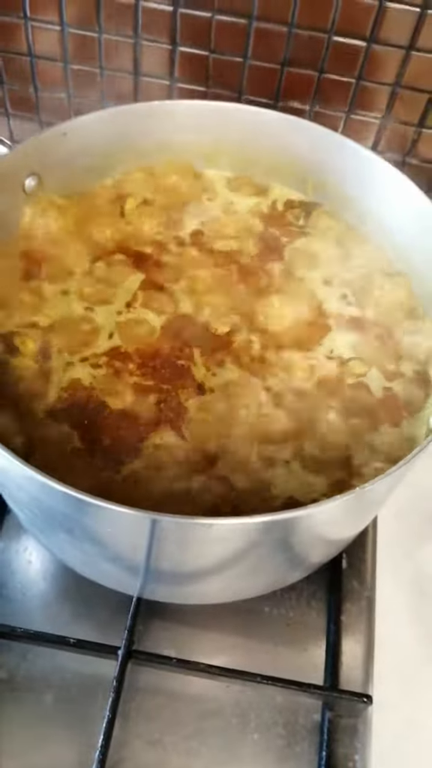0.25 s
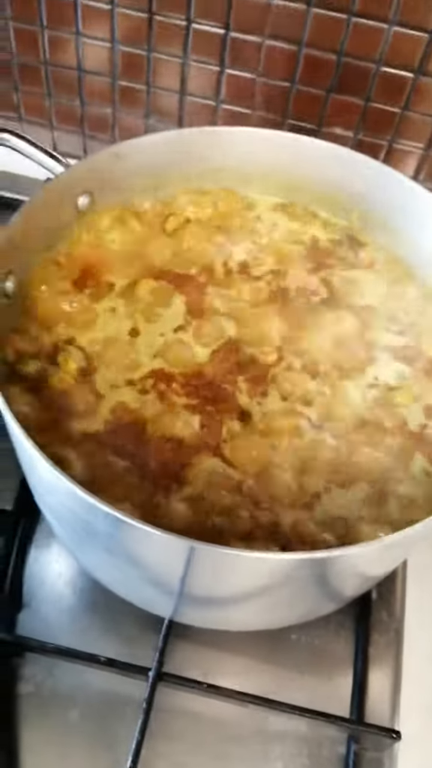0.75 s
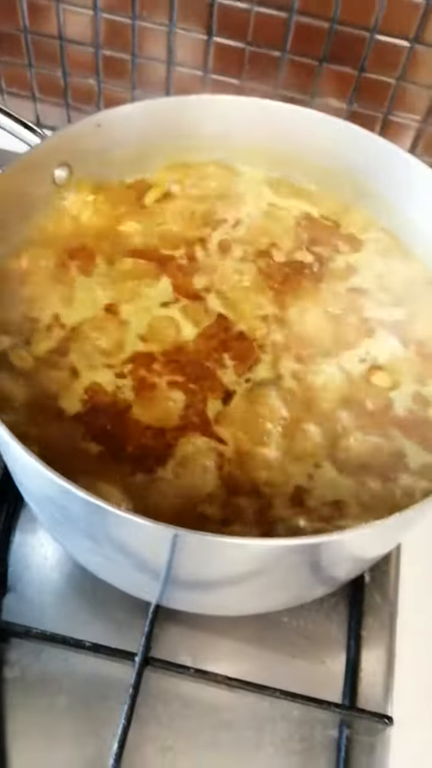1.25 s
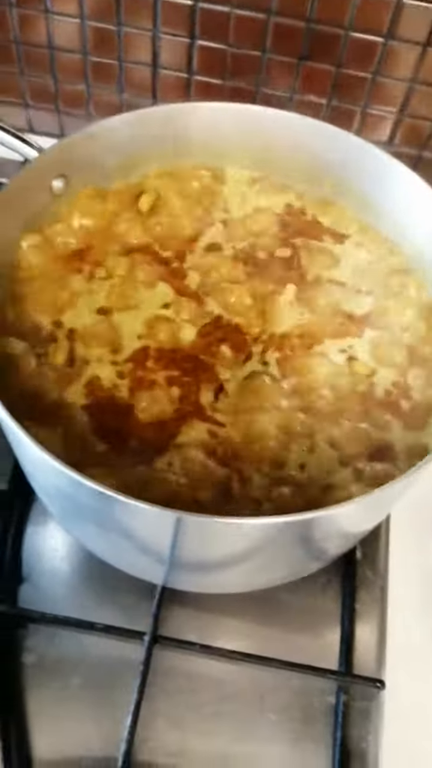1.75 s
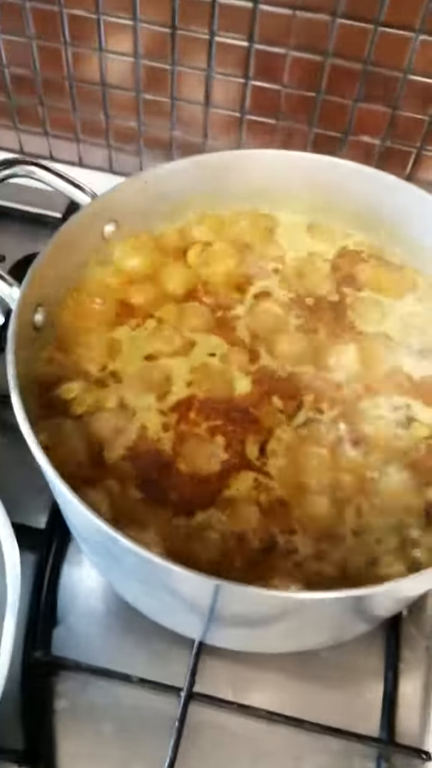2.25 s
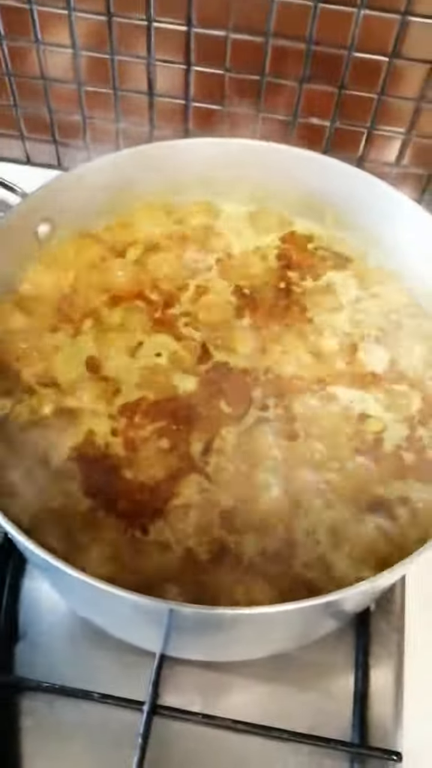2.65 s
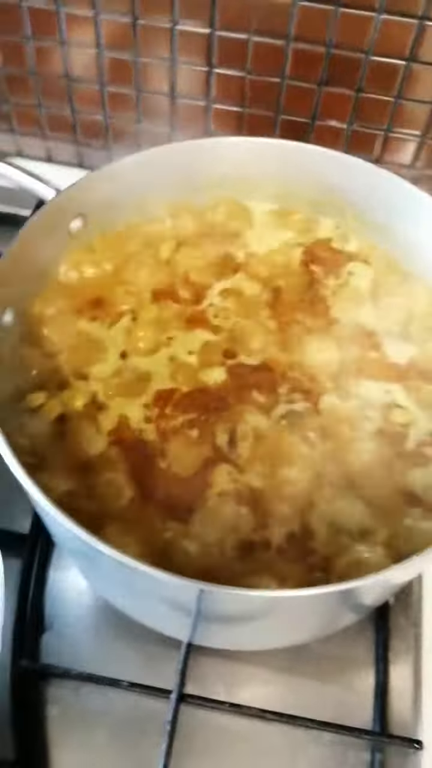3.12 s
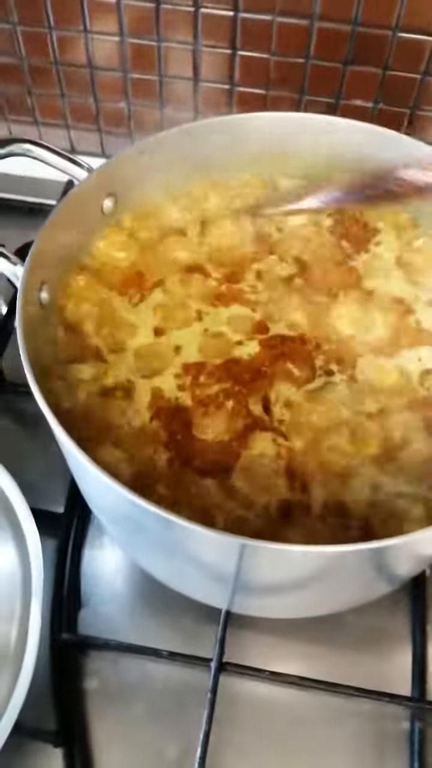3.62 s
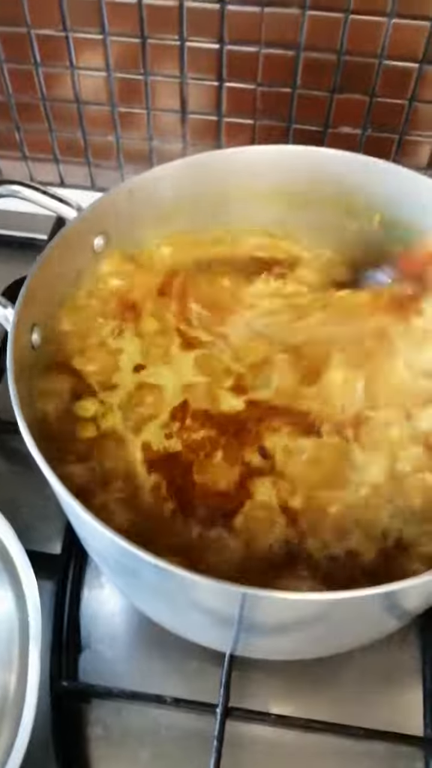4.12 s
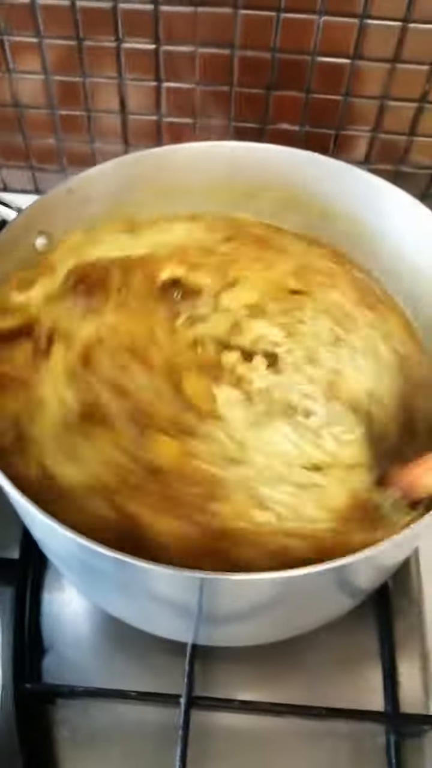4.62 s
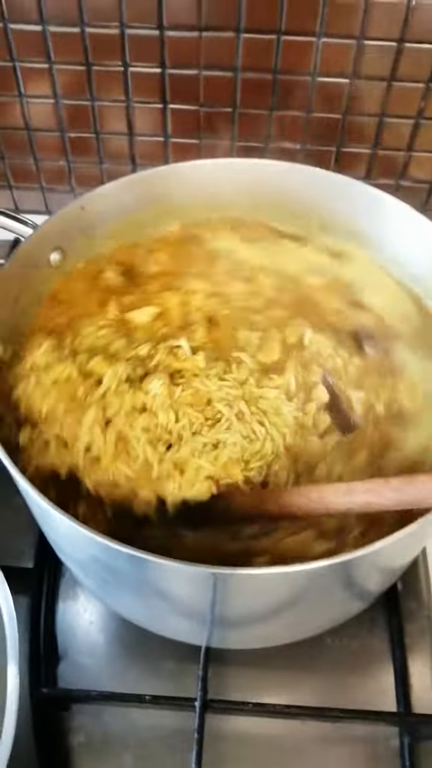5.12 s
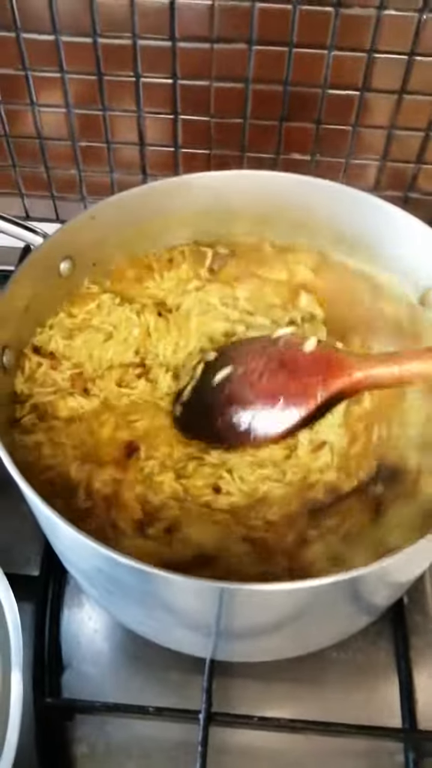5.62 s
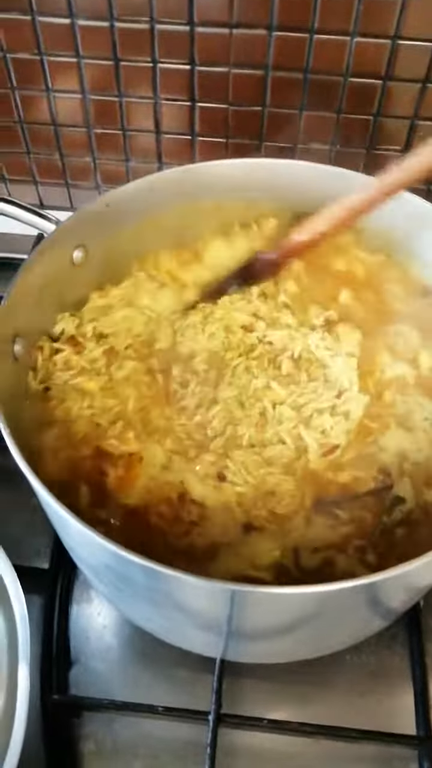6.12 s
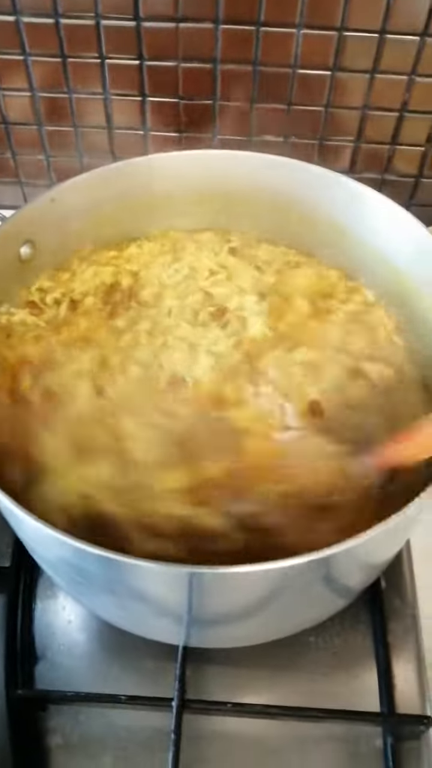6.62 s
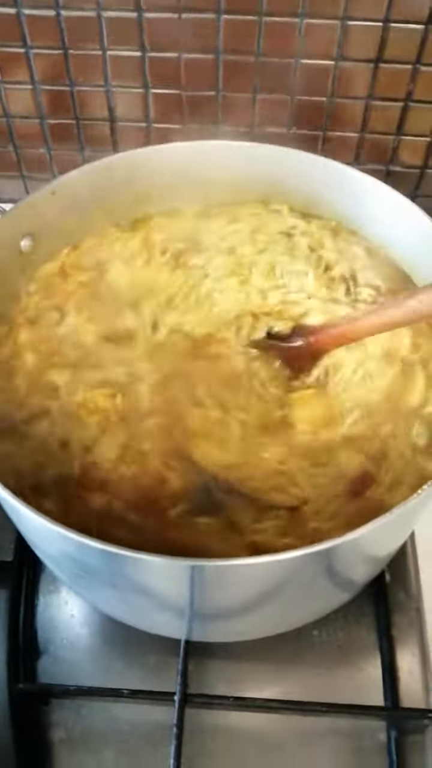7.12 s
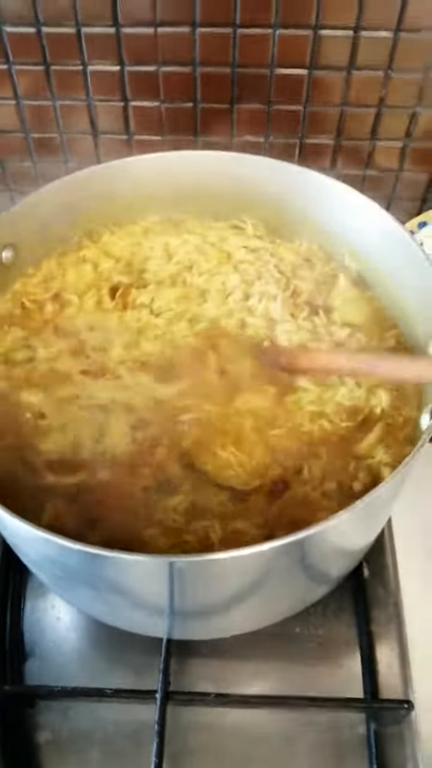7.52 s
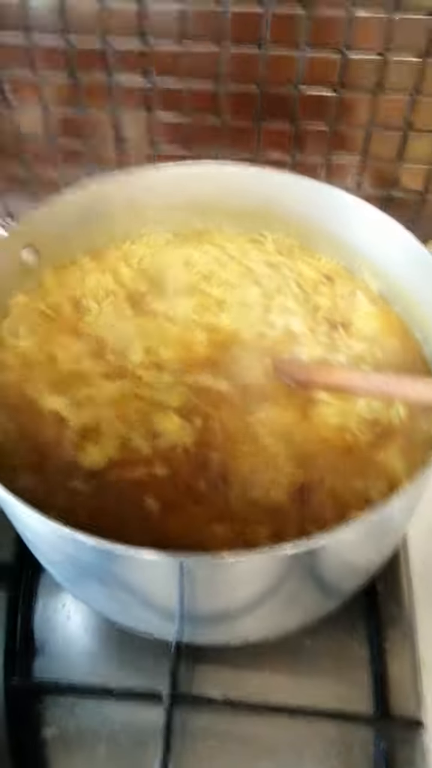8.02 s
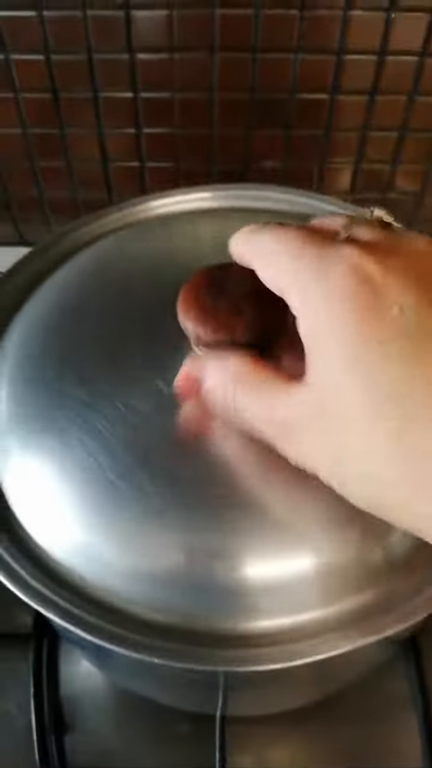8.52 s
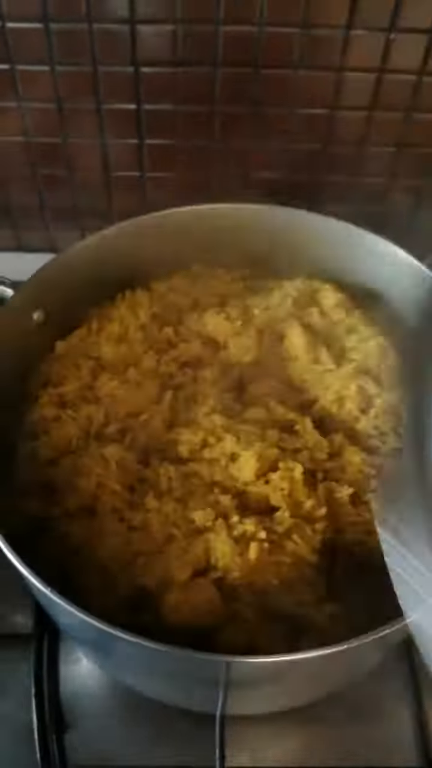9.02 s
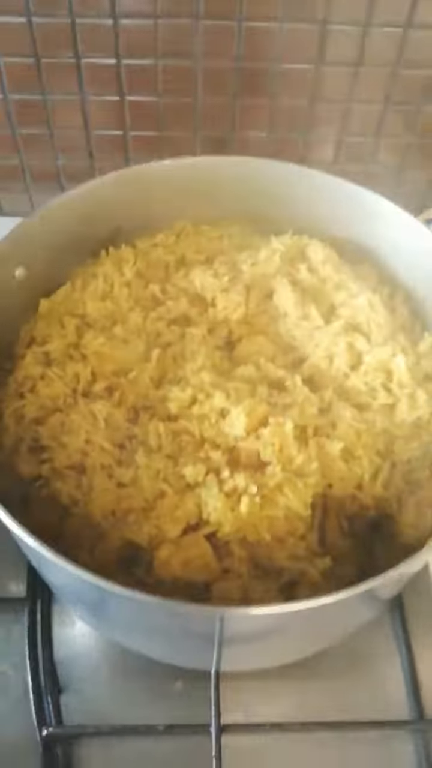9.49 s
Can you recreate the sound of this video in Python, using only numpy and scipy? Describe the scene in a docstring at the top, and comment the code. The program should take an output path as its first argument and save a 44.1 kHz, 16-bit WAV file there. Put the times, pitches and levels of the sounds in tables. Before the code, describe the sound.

A simmering metal pot hisses and spatters, wooden spoon tapping and stirring, before the hiss cuts off and a lid lifts with soft steam.

```python
"""Rice simmering on a gas ring

Rice simmers in broth in an open metal pot in a tiled kitchen: banded noise for roar, broth and hissing
jets, ringing grains for bubbles and droplets, short rising tones. A steel spoon clinks in decaying modes;
a wooden spoon knocks and stirs through pot resonances. Hiss, spatter and small bubbles end at once; a
quieter passage follows, in which a lid is lifted off, ringing, and noise bands of steam escape.
Two ports hear it, left one first.
"""
import sys
import numpy as np
from scipy import signal
from scipy.fft import rfft, irfft, next_fast_len
from scipy.io import wavfile

SR = 44100
rng = np.random.default_rng(int(sys.argv[2]) if len(sys.argv) > 2 else 0)


def persist_wave(psi):
    """Save psi, clipped to +-1, as 16-bit WAV."""
    counts = np.round(np.clip(psi, -1, 1) * 32767).astype(np.int16)
    wavfile.write(sys.argv[1], SR, np.atleast_2d(counts).T)


N = 429975

# Noise spectra, relative density: f/Hz, level/dB
# low roar under the simmer
ROAR_SPECTRUM = [(15, -46), (25, -17), (60, 1.5), (102, -5), (141, 4), (237, -13), (289, -2.5), (367, -3),
                 (436, -31), (600, -1), (780, -51), (1320, -120)]
# broth
BROTH_SPECTRUM = [(240, -22), (400, -36), (436, -9), (609, -8.5), (744, -6.5), (1050, 4.5), (1220, -35),
                  (1350, -16.5), (1450, -22), (1760, -10.5), (1950, -25), (2200, -32), (2860, -53),
                  (4840, -120)]
# gas jets
HISS_SPECTRUM = [(760, -22), (1300, -16), (1760, -26), (3140, -5), (3760, -19), (5720, -3), (6480, -2.5),
                 (7830, -21), (8700, -12.5), (9070, -23), (13000, -9), (14900, -13), (15500, -20),
                 (16000, -48)]
# steam
STEAM_SPECTRUM = [(880, -20), (1500, -6), (2410, -13.5), (3000, -14.5), (5770, -17.5), (6310, 38),
                  (7390, -3.5), (10800, -9.5), (14800, -6), (16000, -13)]
# quiet kitchen air
AIR_SPECTRUM = [(410, -15), (700, 1), (1870, -11), (2330, -3.5), (3370, 7), (3640, -31), (4730, 6.5),
                (16000, -19.5)]
# Small bubbles, grain pitches: f/Hz, level/dB
BUBBLE_SPECTRUM = [(450, -10.5), (800, 2.5), (1050, 3.5), (1400, -9), (2800, 0)]
# Droplets on hot metal, grain pitches: f/Hz, level/dB
SNAP_SPECTRUM = [(2300, 0), (3800, -10), (6500, 9), (9500, 0)]
# Left-right likeness of the noise: f/Hz, likeness/0-1
LIKENESS = [(60, .92), (170, .93), (340, .8), (520, .15), (1030, .45), (1600, .2), (5500, .2), (6500, .5),
            (7600, .1), (15000, .15)]
# Port colour: f/Hz, left over right/dB
PORT_TILT = [(60, -3), (92, -2.5), (140, -1), (210, -3.5), (330, -2), (500, -4), (770, 3.5), (1170, 0),
             (1790, -1.5), (2740, -6.5), (4190, -2), (6410, -3), (9810, 7.5), (15000, -2)]

# Vigour of the simmer, as its low roar: t/s, level/dB
HEAT_CURVE = [(0, -59.5), (1.6, -57.5), (2.05, -54), (2.95, -53.5), (3.4, -54.5), (5.0, -56.5),
              (7.4, -57.5), (8.05, -57), (8.75, -53.5), (9.0, -55.5), (9.75, -59.5)]
# Jets of the open flame: t/s, level/dB
JET_CURVE = [(0, -58), (1.6, -59.5), (1.74, -53.5), (3.0, -53), (7.3, -53.5), (8.06, -52)]

# Burner resonances: f/Hz, width/Hz, level/dB
WHISTLES = [(1990, 61, 8.5), (2486, 184, 7), (3214, 85, 5.5), (5590, 370, 0.5), (5890, 20, 7.5),
            (6444, 217, 14), (7085, 136, 5), (8475, 51, 16), (11400, 94, -27), (14750, 720, 5)]
# Full pot: f/Hz, width/Hz, level/dB
THUD_MODES = [(150, 60, -2), (300, 80, 0), (400, 90, -3), (560, 120, 2), (650, 120, 0), (870, 160, -2)]
# Wood and wall: f/Hz, width/Hz, level/dB
KNOCK_MODES = [(1100, 320, -28), (1590, 860, 9), (2040, 500, 16.5), (2575, 530, 12.5), (3740, 1000, 13.5)]
# Rim: f/Hz, width/Hz, level/dB
TICK_MODES = [(5400, 1740, 11), (5460, 340, -1), (7010, 240, 10.5), (7320, 850, 13.5), (8450, 600, 2.5),
              (11240, 1400, -6), (14100, 3300, -8.5)]
# Steel spoon modes: f/Hz, level/dB, t60/s, pan/dB
SPOON_MODES = [(2564, -1, .36, -2), (2585, -3, .03, -3), (2603, -3, .33, -5), (2655, -12, .05, -2),
               (2950, -16, .05, -2), (3400, -17, .05, 0), (3750, -16, .05, 0), (5071, -21, .07, 0),
               (6072, -19, .2, -3), (6557, -13, .18, -5), (6590, -9, .22, 0), (6625, -13, .18, -3),
               (7354, -21, .1, -4), (7897, -24, .1, -4), (8990, -17, .12, 2), (9130, -21, .12, 0),
               (10770, -17, .1, -2), (13145, -22, .07, -2), (14222, -16, .06, -6)]
# Lid modes: f/Hz, level on rim/dB, level free/dB, t60 free/s
LID_MODES = [(950, 2, -20, .1), (1357, -16, 0, 1.5), (1433, -16, 1.5, 1.3), (1660, 1, -20, .1),
             (1850, 2, -20, .1), (2166, 2, -18, .12), (2404, 0, -4, .95), (2568, -12, -7, .5),
             (3160, -12, -10, .3), (3268, 2, 1, .3), (3332, -3, 5, .27), (3650, -14, -12, .3),
             (4097, -14, -16, .25), (4613, -8, -8, .15), (5421, -6, -8, .13), (5885, 0, -9, .12),
             (6638, -2, -12, .15), (6724, -10, -11, .15), (6955, -4, -14, .15), (7111, -12, -9, .12),
             (7311, 4, -4, .1), (7558, -12, -5, .12)]

# Steel spoon touches: t/s, level/dB, upper modes/dB, top modes/dB
CLINKS = [(0.0, -47, -10, -10), (1.543, -21, -4.5, -2), (1.6208, -39, 10, -18), (1.632, -40.5, 11, -16),
          (1.698, -26.5, 10, 5.5)]
# Blows on the pot: t/s, thud/dB, knock/dB, tick/dB, thud centre f/Hz, knock centre f/Hz, t60/s, pan/dB
BLOWS = [(0.07, -58, -46, -51, 571, 1900, 0.017, 8), (0.071, -61, -40.5, -55, 571, 3000, 0.014, 11),
         (0.083, -49, -46, -60, 800, 1480, 0.03, 11), (0.353, -65, -48, -52, 600, 2400, .015, 7),
         (0.538, -65, -50, -58, 600, 1900, 0.018, 8), (0.897, -36.5, -34.5, -13.5, 312, 1650, 0.026, 2),
         (0.898, -58, -34, -38, 500, 2570, .03, 5), (2.014, -52, -53, -33.5, 568, 1120, .035, -3),
         (2.242, -63, -34, -46, 606, 1820, 0.07, 3), (2.246, -70, -36.5, -60, 606, 3300, 0.056, -3),
         (2.413, -33, -29, -25.5, 357, 1900, 0.066, -0.5), (2.417, -44, -35, -52, 800, 1230, 0.083, -2),
         (2.556, -58, -27, -35.5, 353, 2070, 0.034, 2), (2.558, -60, -28.5, -56, 353, 3170, 0.027, -1),
         (2.563, -47, -32, -55, 800, 1520, 0.033, 0), (2.691, -43, -40, -55, 700, 1970, 0.03, 2),
         (2.897, -43, -37.5, -56, 563, 1430, 0.03, 5), (2.956, -57, -43, -58, 361, 2420, 0.019, -4),
         (3.236, -65, -44, -44, 600, 2450, 0.033, 0), (3.466, -65, -43, -55, 600, 2550, 0.03, -4),
         (3.752, -33, -41, -55, 606, 1100, 0.026, -5), (4.903, -65, -41, -50, 700, 2700, 0.014, 2),
         (4.94, -65, -41, -41, 700, 2720, 0.023, 1), (4.945, -60, -38.5, -41, 850, 934, 0.04, 4),
         (5.066, -65, -46, -60, 400, 2600, 0.011, -2), (5.168, -63, -40, -55, 400, 2300, .012, 3),
         (5.181, -66, -39, -40, 363, 1690, 0.024, -4), (5.182, -63, -39.5, -55, 400, 2480, .015, -3),
         (5.773, -65, -38, -60, 299, 2940, 0.037, 2), (5.803, -68, -44, -51, 299, 2830, 0.033, 7),
         (5.84, -68, -43, -58, 299, 3100, 0.03, -2), (6.378, -44.5, -40, -41, 312, 1990, 0.03, 5),
         (6.42, -58, -39, -50, 400, 3100, .015, 3), (6.496, -62, -39, -55, 304, 2720, 0.027, 1),
         (6.5, -62, -40, -55, 304, 1250, 0.061, 8), (6.509, -67, -34, -55, 304, 3100, 0.01, 1),
         (6.519, -65, -35, -50, 304, 2730, 0.017, -3), (6.518, -63, -40, -33.5, 361, 1100, 0.02, 0),
         (6.628, -57, -40.5, -45, 619, 2100, 0.054, 6), (6.676, -65, -35, -49, 400, 3000, 0.018, 4),
         (6.696, -69, -40, -34.5, 221, 2880, 0.026, 7), (6.808, -65, -39.5, -57, 334, 2610, 0.028, 0),
         (6.946, -54, -39, -44, 350, 2740, 0.023, -5), (7.483, -24, -31.5, -44, 307, 1090, 0.039, -0.5),
         (7.485, -52, -32.5, -55, 306, 2330, 0.02, 8), (7.535, -29.5, -34, -53, 350, 1010, 0.037, 2),
         (7.75, -52, -23.5, -53, 560, 2470, 0.013, -2), (7.835, -67, -38, -60, 560, 2120, 0.016, 6),
         (7.974, -70, -45, -55, 560, 3570, 0.017, 4), (7.986, -69, -48, -33.5, 304, 1140, 0.025, 13),
         (8.186, -69, -42.5, -75, 530, 1610, 0.0089, -10), (8.31, -72, -51, -50, 288, 2200, 0.088, -7),
         (8.394, -24, -27.5, -19.5, 310, 942, 0.016, -2.5),
         (8.402, -31.5, -23.5, -18.5, 800, 1850, 0.071, -4),
         (8.419, -34, -30.5, -25, 280, 2190, 0.042, -8.5), (8.596, -40, -46, -48, 224, 1065, 0.1, -1),
         (8.613, -33.5, -34, -35, 314, 955, 0.065, -1), (8.614, -60, -38, -45, 314, 1910, 0.036, -1),
         (8.641, -37, -37, -33, 299, 3370, 0.031, 2), (9.697, -56, -46.5, -44, 549, 1200, 0.02, -2)]
# Short rising tones, from bubbles or small knocks: t/s, level/dB, starting f/Hz
POPS = [(0.09, -41, 900), (0.241, -37, 800), (0.309, -45, 754), (0.591, -39.5, 790), (0.613, -41, 750),
        (1.483, -43, 890), (1.513, -39, 845), (1.945, -41, 612), (2.036, -38, 880), (2.99, -40, 622),
        (3.377, -42, 842), (4.774, -44, 1000), (6.397, -36, 1100), (7.075, -38, 888), (0.166, -36, 850),
        (0.216, -31.5, 1100), (0.272, -36, 1500), (0.327, -34, 784), (0.54, -38, 790), (0.671, -36.5, 775),
        (1.38, -36, 890), (1.982, -32, 820), (2.323, -33.5, 686), (2.382, -32, 950), (2.715, -33.5, 930),
        (2.865, -36.5, 675), (2.927, -41, 705), (3.115, -35, 1590), (3.201, -35.5, 750),
        (3.567, -35.5, 1100), (3.93, -33, 1360), (4.239, -30, 1390), (4.268, -34, 1350), (4.966, -36, 930),
        (2.329, -32, 1500), (2.367, -33, 1900), (2.403, -29, 810), (2.468, -35, 900), (2.755, -37, 1150),
        (5.706, -33, 1030), (5.781, -40, 1040), (5.83, -39, 1080), (5.976, -34, 1340), (8.187, -34, 900)]
# Spoon strokes on the wall: t/s, length/s, grit/dB, squeak/dB, first f/Hz, last f/Hz
STROKES = [(1.614, .04, -53, -70, 3500, 3500), (2.407, 0.067, -53.5, -44.5, 2350, 2240),
           (2.555, 0.12, -58.5, -45.5, 2535, 2014), (4.866, 0.089, -60.5, -58, 1900, 1940),
           (5.747, 0.069, -71, -64, 2600, 2940), (6.371, 0.55, -63, -64, 2300, 2750),
           (7.762, 0.16, -64, -51.5, 2010, 1917), (8.025, 0.076, -67, -78, 2500, 2480)]
# Broth heaving, rice rustling round the spoon, air under the lifted lid: t/s, level/dB, f/Hz, length/s
GULPS = [(3.765, -48, 610, 0.062), (3.764, -46, 332, .08), (4.579, -52, 142, 0.18), (4.58, -54.5, 71, .18),
         (4.609, -52, 310, 0.1), (6.382, -52, 294, 0.12), (7.488, -41, 153, .14), (7.49, -47, 310, .09),
         (7.489, -52, 78, .14), (4.59, -59.5, 213, .14), (8.077, -66.5, 547, 0.28), (8.603, -50, 306, .07),
         (8.798, -53, 608, 0.15), (9.05, -59, 168, 0.074), (9.17, -54, 156, .14)]
# Lid taps: t/s, level/dB
LID_TAPS = [(8.311, -62), (8.395, -38), (8.405, -38.5), (8.616, -59), (8.644, -49.5)]

QUIET_FROM_S, LID_OFF_S = 8.07, 8.42
BROTH_OPEN_DB, BROTH_QUIET_DB, BROTH_LID_OFF_DB = -4.5, -21, -11.5  # over the roar
AIR_DB = -65
DIP_S, DIP_FALL_S, DIP_BACK_S, DIP_DB = 0.904, 0.09, 1.0, -6.5  # roar, broth, jets drop, then recover
STEAM_S, STEAM_RISE_S, STEAM_HOLD_S = 8.704, 0.14, 0.34
STEAM_DB, STEAM_FADE_DB_PER_S = -54.5, 10.5
BUBBLES_DB, BUBBLES_PER_S, BUBBLE_CYCLES = 2, 320, 16  # dB over the broth's noise; median rate
SNAPS_DB, SNAPS_PER_S, SNAP_CYCLES = -10.5, 110, 48  # dB over the jets; median rate
GRAIN_PAN_DB = 10  # to alternate sides
OPPOSED_HZ = 2603  # this mode starts against its neighbour
TOUCH_T60_S = 0.0021  # build-up of the spoon's ring
WANDER_DB, WANDER_RATE_HZ = 1.7, 30  # each spoon mode's level wanders slightly at random
CLICK_DB = 12  # first contact, over the noise that follows
SPOT_DB, SPOT_SHARPNESS = 19, 7  # struck spot's resonance; centre over width
BLOW_ECHO_DB, RING_ECHO_DB, WET_ECHO_DB = -6, -3.0, -3.0
POP_ATTACK_S = 0.003
GRIT_PER_S, GRIT_SPREAD_DB, GRIT_TICK_DB = 400, 6.0, -2
SQUEAK_FLUTTER_TOP_HZ = 100
RESTING_T60_S = 0.09  # lid damped by the rim
KITCHEN_T60_S, TILE_BRIGHTNESS = 0.3, 0.22  # brightness 0-1: how far echoes favour the treble
RIGHT_LAG_SAMPLES, CUTOFF_HZ = 6, 16450


def from_db(db):
    """Decibels to gain."""
    return 10 ** (np.asarray(db) / 20)


def rms_one(x):
    """Scale to rms 1."""
    return x / np.sqrt(np.mean(x ** 2) + 1e-20)


def sides(pan_db):
    """Left and right gains, pan_db apart."""
    return from_db(np.array([[pan_db], [-pan_db]]) / 2)


def in_time(curve):
    """Level curve at every sample."""
    s, level_db = np.transpose(curve)
    return np.interp(np.arange(N) / SR, s, level_db)


def at_hz(points, hz):
    """Curve read on a log frequency axis."""
    point_hz, value = np.transpose(points)
    return np.interp(np.log(hz), np.log(point_hz), value)


def drift(rate_hz):
    """Slow random wander, rms 1, computed every 40 samples."""
    r = np.exp(-80 * np.pi * rate_hz / SR)
    white = rng.standard_normal(N // 40 + 2002)
    slow = signal.lfilter([1], [1, -2 * r, r * r], white)[2000:]
    return np.interp(np.arange(N) / 40, np.arange(len(slow)), rms_one(slow))


def decay_per_sample(t60_s):
    """Gain per sample of a 60 dB decay in t60_s."""
    return from_db(-60 / (t60_s * SR))


def ring(clicks, hz, t60_s):
    """Two-pole ringing: a unit click starts a decaying sine of height 1."""
    r, w = decay_per_sample(t60_s), 2 * np.pi * hz / SR
    return signal.lfilter([0, np.sin(w)], [1, -2 * r * np.cos(w), r * r], clicks + 1e-18)


def resonate(x, peaks):
    """Parallel resonances of alternating sign."""
    out = 0
    for k, (hz, width_hz, db) in enumerate(peaks):
        r = np.exp(-np.pi * width_hz / SR)
        top = (-1) ** k * from_db(db) * (1 - r * r) / 2
        poles = [1, -2 * r * np.cos(2 * np.pi * hz / SR), r * r]
        out = out + signal.lfilter([top, 0, -top], poles, x + 1e-18)
    return out


def bandpass(low_hz, high_hz):
    """Band-pass sections."""
    return signal.butter(2, [low_hz, high_hz], "band", fs=SR, output="sos")


def band(x, low_hz, high_hz):
    """Band-passed signal."""
    return signal.sosfilt(bandpass(low_hz, high_hz), x + 1e-18)


def banded_noise(spectrum, patchy_db, crackle_db):
    """Third-octave stereo noise bands, each with its own level, flicker and likeness; rms 1."""
    first_hz, last_hz = spectrum[0][0], spectrum[-1][0]
    edges = np.geomspace(first_hz, last_hz, round(3 * np.log2(last_hz / first_hz)) + 1)
    out, together = 0, drift(2.6)
    crackle = from_db(crackle_db * np.minimum(rng.exponential(1, N), 4.0))  # shared by all bands
    white = rng.standard_normal((2, 3, N)) * crackle
    for k, (low_hz, high_hz) in enumerate(zip(edges, edges[1:])):
        # neighbouring bands use different noise
        shared, *own = signal.sosfilt(bandpass(low_hz, high_hz), white[k % 2])
        hz = np.sqrt(low_hz * high_hz)
        alike = np.clip(at_hz(LIKENESS, hz), 0, 1)
        flicker_db = patchy_db * (0.35 * together + drift(17.6))
        gain = from_db(at_hz(spectrum, hz) + flicker_db)
        out = out + gain * (np.sqrt(alike) * shared + np.sqrt(1 - alike) * np.array(own))
    return rms_one(out)


def grains(spectrum, per_s, cycles, spread_db):
    """Uneven clicks in clumps, each ringing a few cycles at one of 14 pitches on its own side; rms 1."""
    sizes = from_db(spread_db * np.minimum(rng.exponential(1, N), 4.0)) * rng.choice([-1, 1], N)
    born = rng.random(N) < per_s * from_db(4.0 * drift(4.0)) / SR
    pitches = np.geomspace(spectrum[0][0], spectrum[-1][0], 14)
    dealt = rng.integers(0, 14, N)
    out = 0
    for k, hz in enumerate(pitches):
        rings = ring(sizes * born * (dealt == k), hz, cycles / hz)
        out = out + sides(GRAIN_PAN_DB * (-1) ** k) * from_db(at_hz(spectrum, hz)) * rings
    return rms_one(out)


def roar(roar_db):
    """Low roar: patchy noise bands that follow the vigour of the simmer."""
    return from_db(roar_db) * banded_noise(ROAR_SPECTRUM, patchy_db=3.0, crackle_db=3.0)


def bubbles(broth_db):
    """Small bubbles burst as short rings, up to the quieter passage."""
    rings = grains(BUBBLE_SPECTRUM, BUBBLES_PER_S, BUBBLE_CYCLES, spread_db=2.8)
    before_quiet = np.arange(N) < QUIET_FROM_S * SR
    return from_db(broth_db + BUBBLES_DB) * before_quiet * band(rings, 275, 2030)


def broth(broth_db):
    """Simmering broth: noise bands plus small bubbles."""
    noise = banded_noise(BROTH_SPECTRUM, patchy_db=1.5, crackle_db=2.5)
    return from_db(broth_db) * noise + bubbles(broth_db)


def flame(hiss_db):
    """Gas jets: bright noise, which also excites burner resonances as faint whistles."""
    jets = banded_noise(HISS_SPECTRUM, patchy_db=2.0, crackle_db=5.0)
    return from_db(hiss_db) * rms_one(jets + from_db(3) * resonate(jets, WHISTLES))


def spatter(hiss_db):
    """Droplets snap on hot metal: short high rings."""
    snaps = grains(SNAP_SPECTRUM, SNAPS_PER_S, SNAP_CYCLES, spread_db=0.5)
    return from_db(hiss_db + SNAPS_DB) * band(snaps, 1600, 12000)


def kitchen_air():
    """Quiet room air: noise bands at a steady level."""
    return from_db(AIR_DB) * banded_noise(AIR_SPECTRUM, patchy_db=4.5, crackle_db=0.5)


def steel_spoon():
    """Two close modes start opposed and beat; upper modes vary by touch; each touch also rattles grittily."""
    s, level_db, upper_db, top_db = np.transpose(CLINKS)
    at, modes = np.round(s * SR).astype(int), np.zeros((2, N))
    for hz, mode_db, t60_s, pan_db in SPOON_MODES:
        touch_db = level_db - 6 + mode_db + upper_db * (hz > 4000) + top_db * (hz > 10000)
        sign = -1 if hz == OPPOSED_HZ else 1
        clicks = np.zeros(N)
        clicks[at] = sign * from_db(touch_db)
        wander = from_db(WANDER_DB * drift(WANDER_RATE_HZ))
        built_up = ring(clicks, hz, t60_s) - ring(clicks, hz, TOUCH_T60_S)
        modes += sides(pan_db) * wander * built_up
    touches = np.zeros(N)
    touches[at] = from_db(level_db - 12.5)
    envelope = signal.lfilter([1], [1, -decay_per_sample(0.043)], touches)
    rattle = envelope * rng.standard_normal((2, N))
    return band(modes, 1200, 13000) + band(rattle, 1700, 6400)


def blows():
    """Dying contact noise drives pot, wall and rim resonances; the struck spot colours thud and knock."""
    out, t = np.zeros((2, N + SR)), np.arange(SR // 5) / SR
    bursts = rng.standard_normal((len(BLOWS), 2, len(t)))
    for (s, *part_db, thud_hz, spot_hz, t60_s, pan_db), burst in zip(BLOWS, bursts):
        contact = burst * from_db(-60 * t / max(t60_s, .004)) * np.minimum(t / 0.0032, 1)
        contact[:, 0] += from_db(CLICK_DB)
        same = contact[[0, 0]]  # long waves reach both ports alike
        thud = band(resonate(same, THUD_MODES), thud_hz / 2.08, thud_hz * 1.57)
        near_spot = band(contact, spot_hz / 2.64, spot_hz * 1.42)
        near_spot = band(near_spot, spot_hz / 2, spot_hz * 1.4)
        spot = (spot_hz, spot_hz / SPOT_SHARPNESS, SPOT_DB)
        knock = resonate(near_spot, [spot, *KNOCK_MODES])
        knock = band(knock, spot_hz / 2.6, spot_hz * 1.48)
        tick = band(resonate(contact, TICK_MODES), 4300, 15400)
        blow = 0
        for peak_db, part in zip(part_db, (thud, knock, tick)):
            blow = blow + from_db(peak_db) * part / np.max(np.abs(part), axis=1, keepdims=True)
        out[:, round(s * SR):][:, :len(t)] += sides(pan_db) * blow
    return out[:, :N]


def pops():
    """Short rising tones, from bubbles or small knocks: decaying sines gliding upward."""
    out, t = np.zeros(N + SR), np.arange(SR // 10) / SR
    for s, level_db, hz in POPS:
        shape = from_db(-60 * t * hz / 20.0) * np.minimum(t / POP_ATTACK_S, 1)
        tone = np.sin(2 * np.pi * hz * t * (1 + 2.0 * t))
        out[round(s * SR):][:len(t)] += from_db(level_db) * shape * tone
    return out[:N]


def scrapes():
    """Uneven grit under a dragged spoon clicks into wall and rim; a narrow noise band glides as a squeak."""
    t = np.arange(N) / SR
    sizes = from_db(GRIT_SPREAD_DB * np.minimum(rng.exponential(1, N), 3.0))
    clicks = (rng.random(N) < GRIT_PER_S / SR) * sizes
    envelope = signal.lfilter([1], [1, -decay_per_sample(0.016)], clicks)
    grit = envelope * rng.standard_normal((2, N))
    wall, rim = rms_one(resonate(grit, KNOCK_MODES)), rms_one(resonate(grit, TICK_MODES))
    rasp = wall + from_db(GRIT_TICK_DB) * rim
    flutter = rms_one(band(rng.standard_normal(N), 11, SQUEAK_FLUTTER_TOP_HZ))
    out = np.zeros((2, N))
    for s, length_s, grit_db, squeak_db, first_hz, last_hz in STROKES:
        span = slice(round(s * SR), round((s + length_s) * SR))
        u = np.clip((t[span] - s) / length_s, 0, 1)
        glide_hz = first_hz + (last_hz - first_hz) * u
        squeak = flutter[span] * np.sin(2 * np.pi * np.cumsum(glide_hz) / SR)
        stroke = from_db(grit_db) * rasp[:, span] + from_db(squeak_db) * squeak
        out[:, span] += np.sin(np.pi * u ** .5) * stroke
    return out


def gulps():
    """Narrow-band noise, swelling fast and dying slowly."""
    out = np.zeros(N + SR)
    for s, level_db, hz, length_s in GULPS:
        u = np.linspace(0, 1, round(length_s * SR))
        heave = rms_one(band(rng.standard_normal(SR // 2), hz / 1.1, hz * 1.075))[-len(u):]
        out[round(s * SR):][:len(u)] += from_db(level_db) * heave * np.sin(np.pi * u ** 0.5)
    return out[:N]


def lid():
    """Thin lid: modes damped while on the rim, ringing on once free."""
    s, tap_db = np.transpose(LID_TAPS)
    clicks = np.zeros(N)
    clicks[np.round(s * SR).astype(int)] = from_db(tap_db)
    resting = np.arange(N) < LID_OFF_S * SR
    out = np.zeros(N)
    for hz, rim_db, free_db, t60_s in LID_MODES:
        out += from_db(rim_db) * ring(clicks * resting, hz, RESTING_T60_S)
        out += from_db(free_db) * ring(clicks * ~resting, hz, t60_s)
    return out


def steam():
    """Steam noise swells shortly after the lid comes free, holds, then thins out."""
    t = np.arange(N) / SR - STEAM_S
    fade_db = STEAM_FADE_DB_PER_S * np.maximum(t - STEAM_RISE_S - STEAM_HOLD_S, 0)
    swell = np.clip(t / STEAM_RISE_S, 0, 1)
    noise = banded_noise(STEAM_SPECTRUM, patchy_db=1.3, crackle_db=5.0)
    return from_db(STEAM_DB - fade_db) * swell * noise


def kitchen(x):
    """Dense tile echoes: decaying noise responses, unrelated at the two ports."""
    t = np.arange(SR // 2) / SR
    echoes = rng.standard_normal((2, len(t))) * from_db(-60 * t / KITCHEN_T60_S) * (t > .006)
    echoes = signal.lfilter([1, -TILE_BRIGHTNESS], [1], echoes)
    echoes = echoes / np.sqrt(np.sum(echoes ** 2, axis=1, keepdims=True))
    return signal.fftconvolve(x, echoes, axes=1)[:, :N]


def scene():
    """Steady layers under the struck ones, whose echoes are added."""
    t = np.arange(N) / SR
    dip_db = np.interp(t, DIP_S + np.cumsum([0, DIP_FALL_S, DIP_BACK_S]), [0, DIP_DB, 0])
    roar_db, hiss_db = in_time(HEAT_CURVE) + dip_db, in_time(JET_CURVE) + dip_db
    before_quiet = t < QUIET_FROM_S  # hiss and spatter end at once
    quiet_db = np.where(t < LID_OFF_S, BROTH_QUIET_DB, BROTH_LID_OFF_DB)
    broth_db = roar_db + np.where(before_quiet, BROTH_OPEN_DB, quiet_db)
    simmer = roar(roar_db) + broth(broth_db)
    gas = before_quiet * (flame(hiss_db) + spatter(hiss_db))
    air = kitchen_air()
    knocks = blows() + scrapes()
    rings = steel_spoon() + lid()
    wet = pops() + gulps()
    sent = from_db(BLOW_ECHO_DB) * knocks + from_db(RING_ECHO_DB) * rings + from_db(WET_ECHO_DB) * wet
    return simmer + gas + steam() + air + knocks + rings + wet + kitchen(sent)


def record(dry):
    """The ports differ in colour, the right one hears later; the top is cut."""
    size = next_fast_len(N)
    hz = np.fft.rfftfreq(size, 1 / SR) + 1  # +1 keeps the log finite
    tilt = from_db(at_hz(PORT_TILT, hz) / 2)
    late = np.exp(-2j * np.pi * hz * RIGHT_LAG_SAMPLES / SR)
    heard = irfft(rfft(dry, size) * np.array([tilt, late / tilt]), size)[:, :N]
    return signal.sosfilt(signal.cheby2(14, 70, CUTOFF_HZ, fs=SR, output="sos"), heard)


dry = scene()
out = record(dry)
persist_wave(out)
```